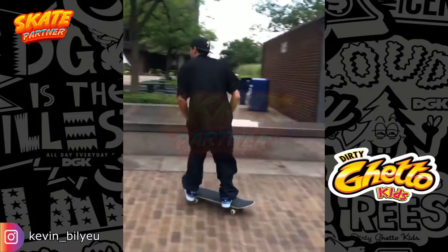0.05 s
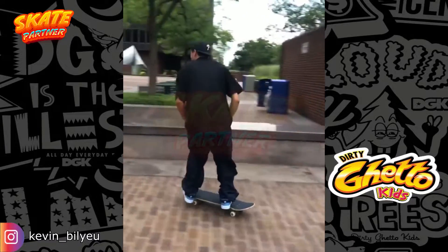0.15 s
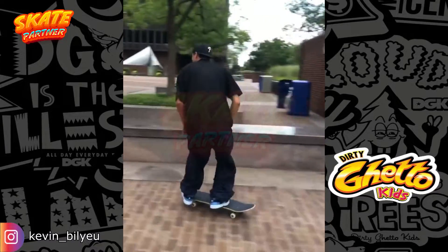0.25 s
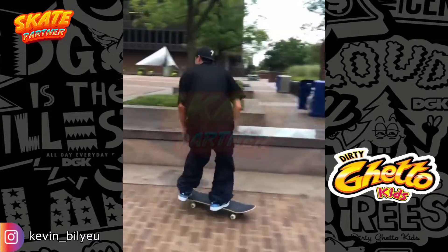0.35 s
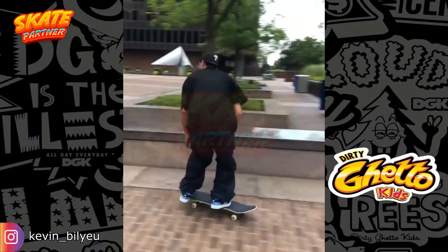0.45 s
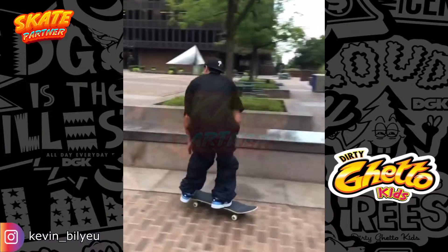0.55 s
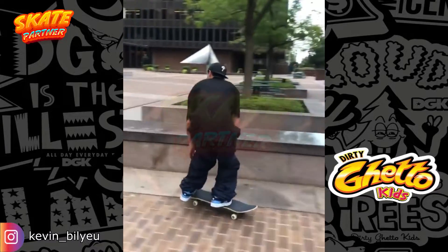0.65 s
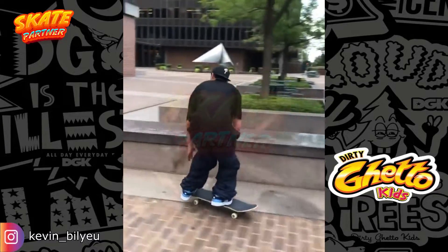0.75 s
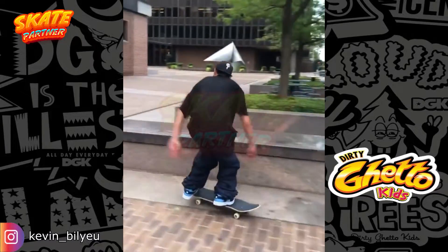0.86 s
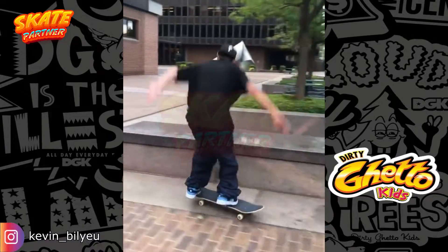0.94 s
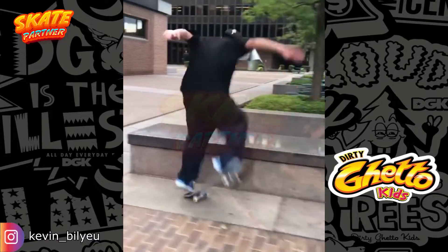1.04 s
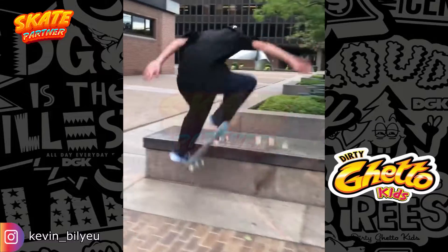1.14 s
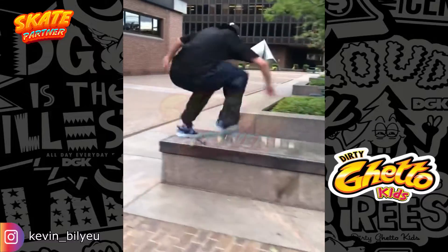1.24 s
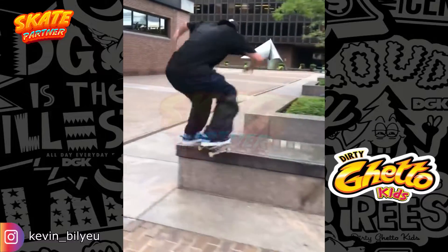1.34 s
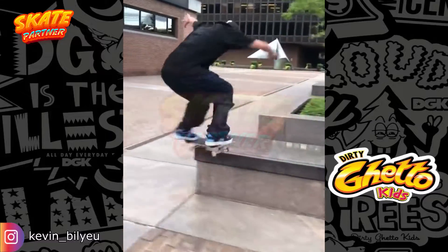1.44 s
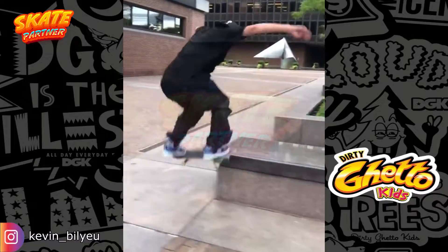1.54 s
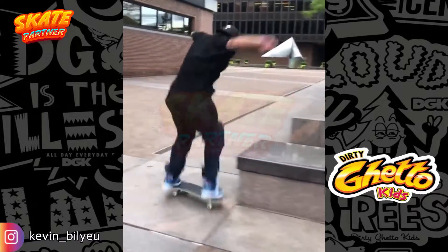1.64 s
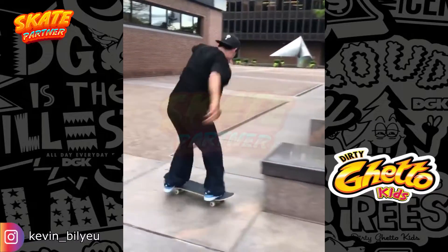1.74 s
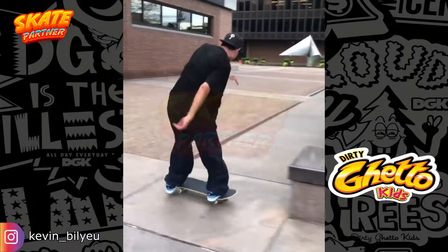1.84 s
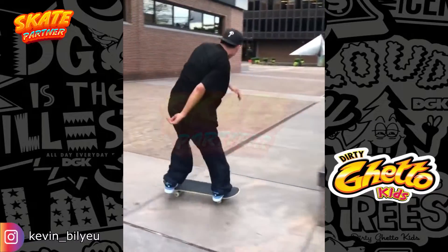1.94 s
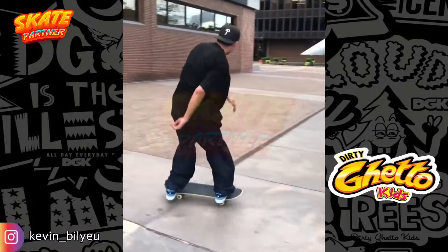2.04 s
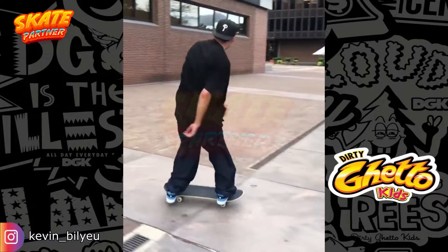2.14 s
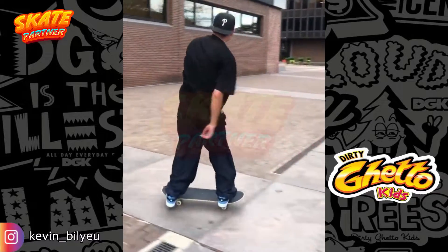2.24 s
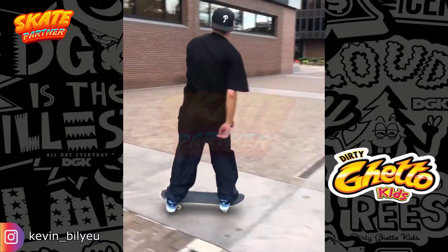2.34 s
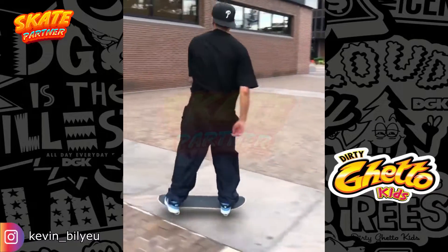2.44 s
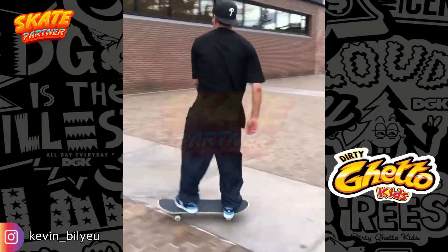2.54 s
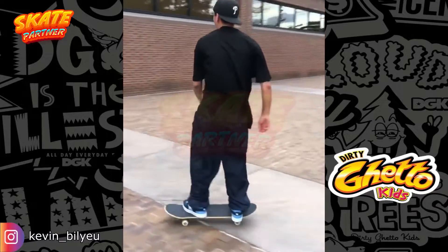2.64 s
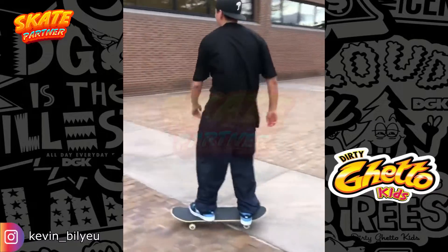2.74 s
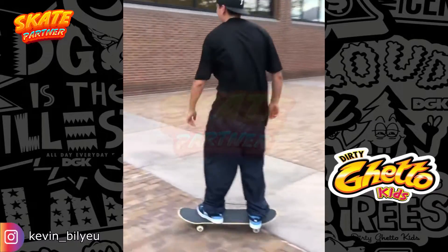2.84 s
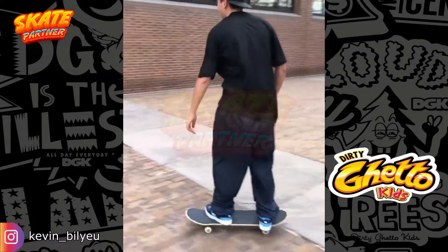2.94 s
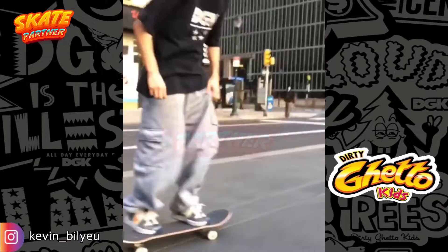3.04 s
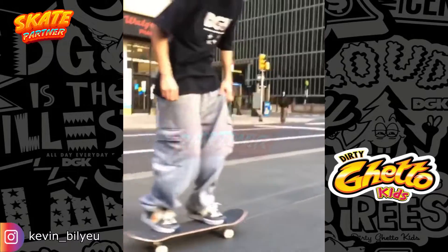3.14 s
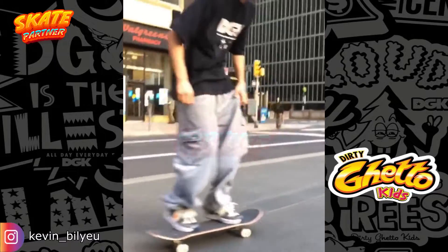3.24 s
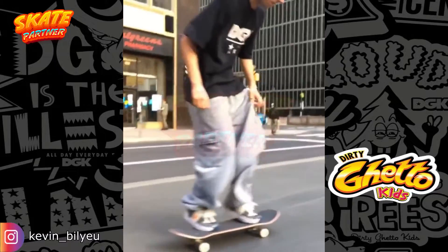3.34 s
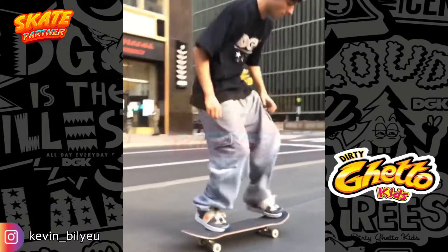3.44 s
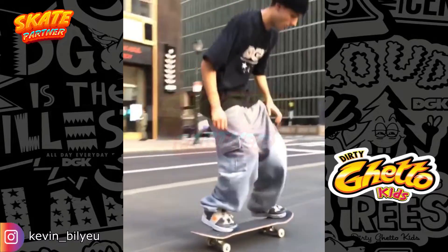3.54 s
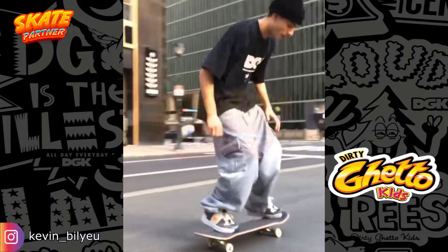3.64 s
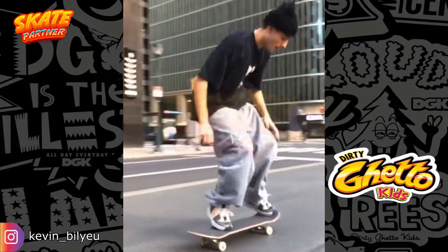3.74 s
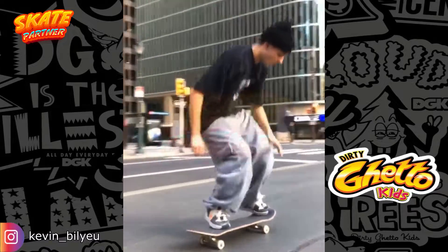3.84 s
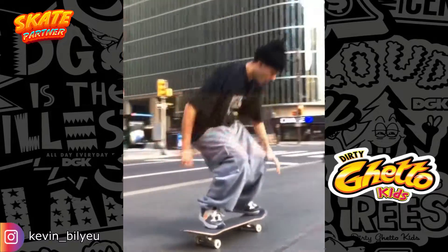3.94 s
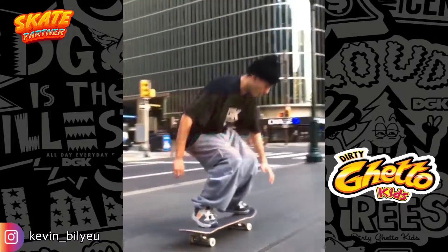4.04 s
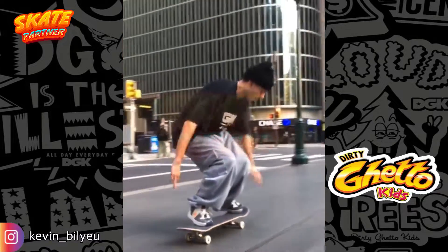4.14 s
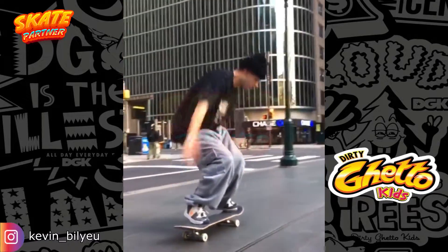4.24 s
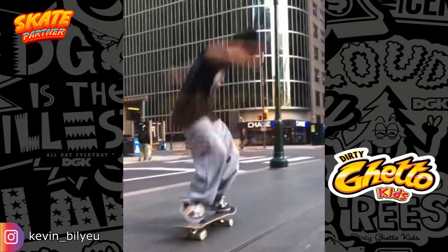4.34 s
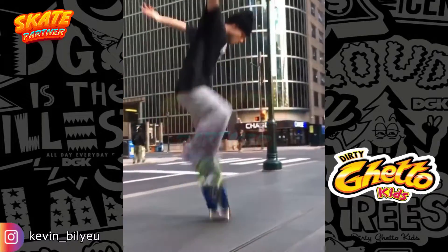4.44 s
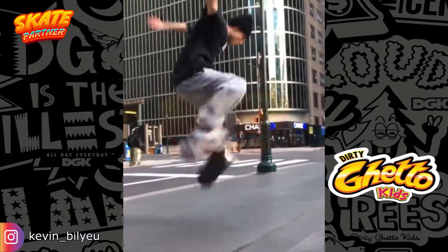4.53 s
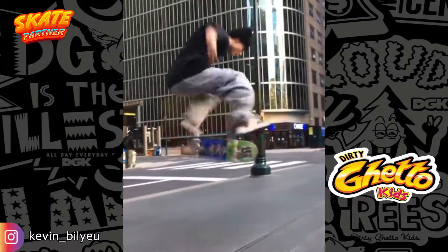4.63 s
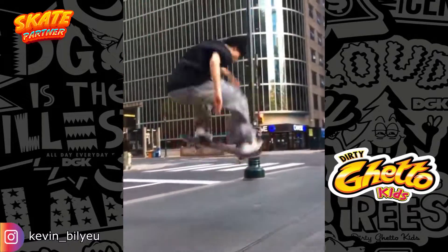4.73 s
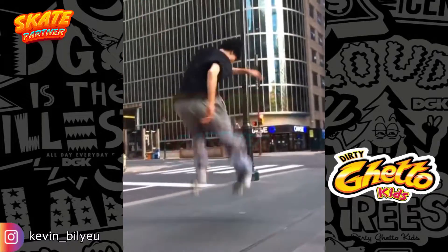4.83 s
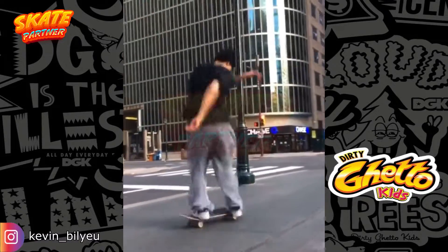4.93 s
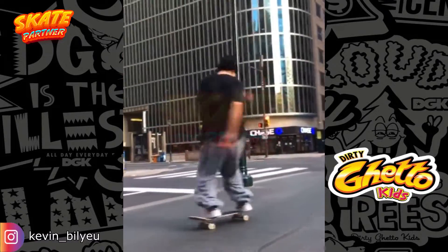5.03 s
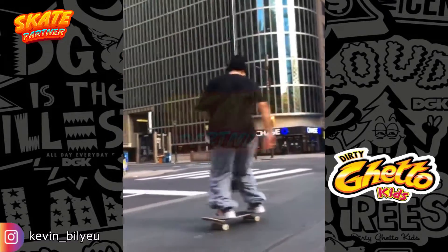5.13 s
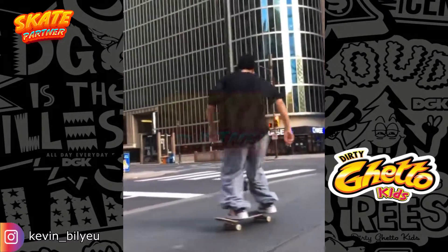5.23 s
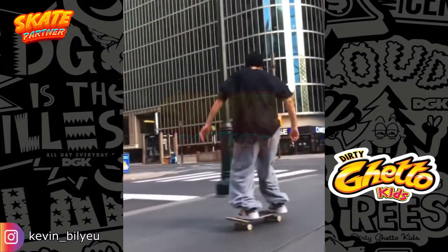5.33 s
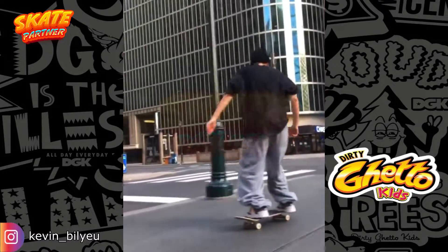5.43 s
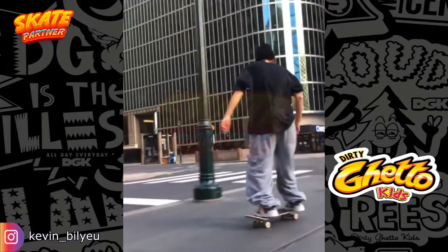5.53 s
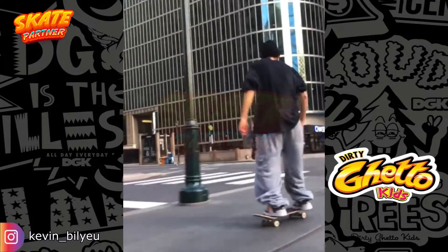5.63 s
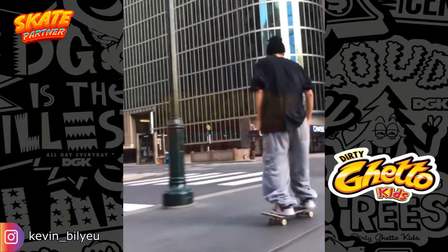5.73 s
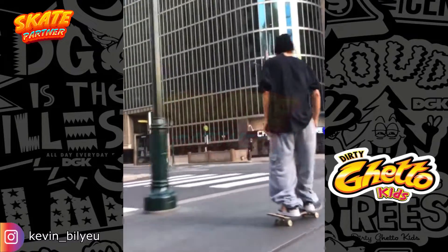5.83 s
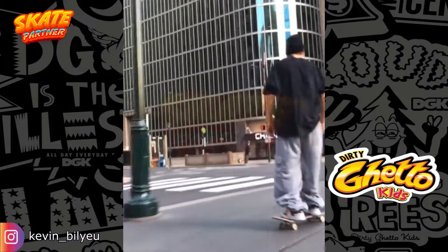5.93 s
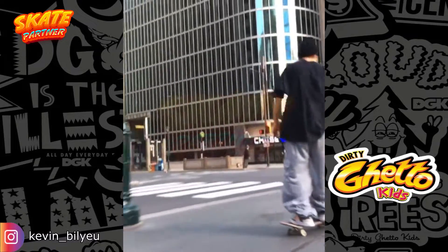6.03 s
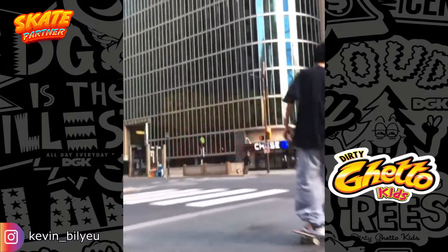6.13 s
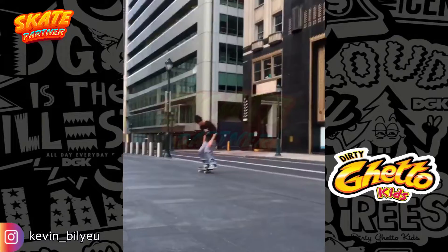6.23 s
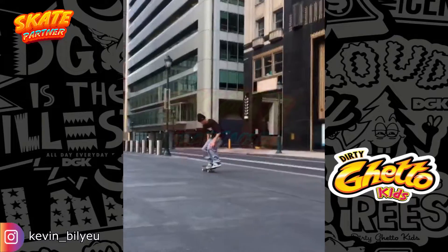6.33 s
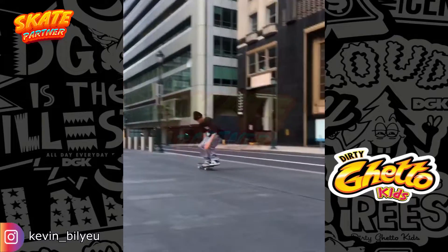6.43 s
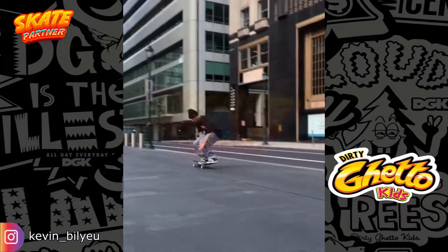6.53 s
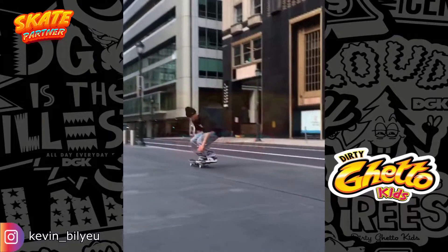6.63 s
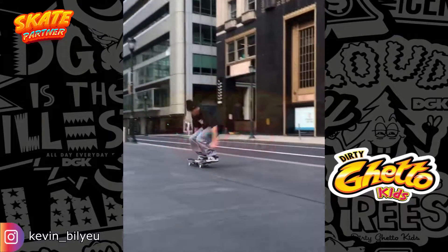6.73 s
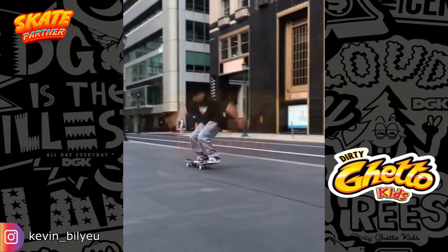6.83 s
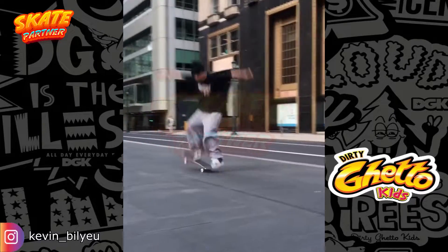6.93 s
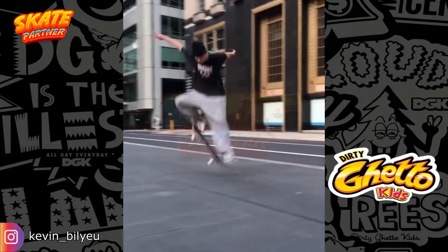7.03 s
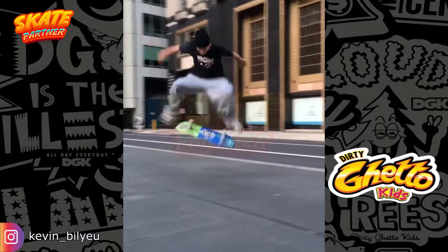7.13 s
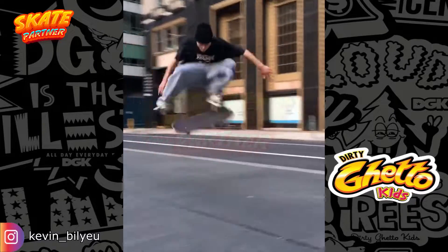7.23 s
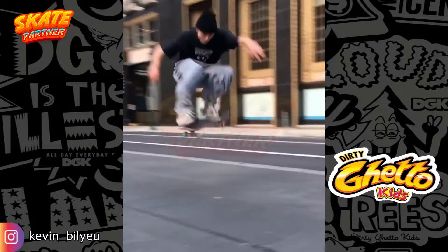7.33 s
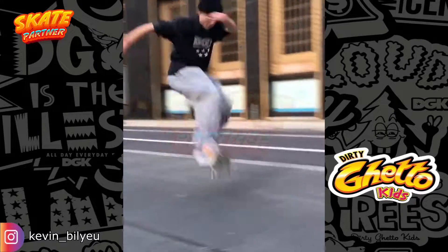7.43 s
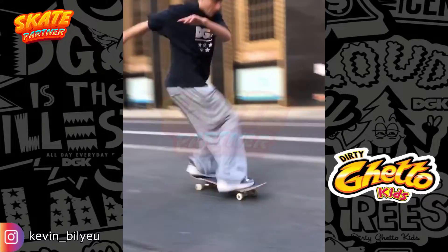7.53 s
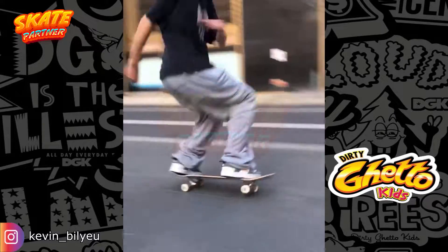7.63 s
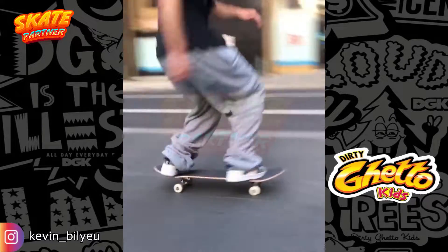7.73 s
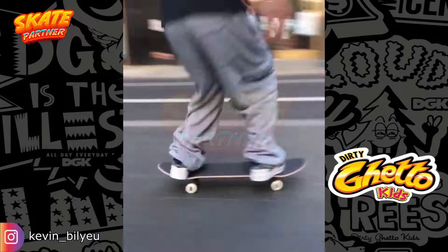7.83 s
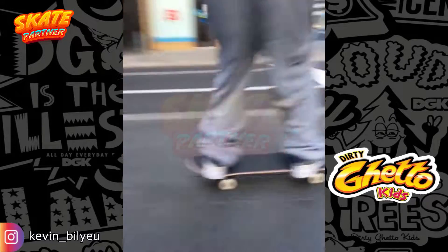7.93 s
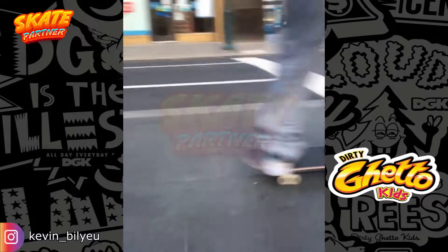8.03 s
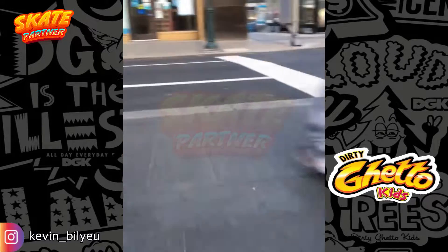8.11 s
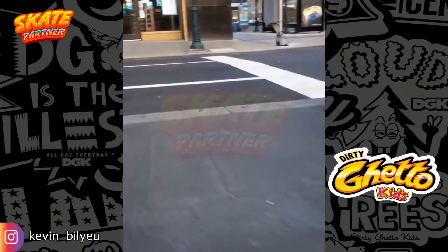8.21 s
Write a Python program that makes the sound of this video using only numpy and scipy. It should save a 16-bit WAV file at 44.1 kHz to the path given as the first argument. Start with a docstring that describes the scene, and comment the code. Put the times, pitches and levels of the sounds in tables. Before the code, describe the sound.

Three skateboard rides follow one another outdoors, heard from a moving microphone. First comes a warm, dull roll on brick with a tail pop, a short ledge grind and a heavy landing. Next the board coasts alongside on asphalt with gusts of wind, regular clacks and one sharp jump. Finally it approaches along a street, snaps up with a faint echo, lands hard and clatters close by.

```python
"""A moving microphone follows a skateboard through three spots; ground grain shakes deck and wheels, and the
bearings hiss. First a brick plaza, warm and dull: cracks knock, the tail pops, a truck grinds a ledge, the
board slams down. From 3 s it coasts alongside over an asphalt crossing, wind buffeting the microphone, with one
flip trick, while the camera's own board clacks in fours over seams. From 6.25 s, on an avenue, it pops far off,
lands nearer and rolls up close. House fronts answer the blows faintly throughout."""
import sys
import numpy as np
from scipy import signal
from scipy.fft import rfft, irfft, next_fast_len
from scipy.io import wavfile

SR = 44100
rng = np.random.default_rng(int(sys.argv[2]) if len(sys.argv) > 2 else 0)


def bounce(signal):
    """Save signal as a 16-bit WAV file at the path given by the first command-line argument."""
    frames = np.transpose(np.atleast_2d(signal))
    limited = np.clip(frames, -1, 1)
    pcm = np.round(limited * 32767).astype(np.int16)
    wavfile.write(sys.argv[1], SR, pcm)


N = 364694
TIME = np.arange(N) / SR
SIZE = next_fast_len(N + SR // 2, real=True)
FREQS = np.maximum(np.arange(SIZE // 2 + 1) * SR / SIZE, 1)
WHEELBASE_M, SEAM_GAP_M = .357, .521

# Time spent at each spot. Each row: start and end in seconds.
SPOTS = [(-.1, 2.986), (3.052, 6.25), (6.25, 8.4)]
PLAZA_SPAN, CROSSING_SPAN, AVENUE_SPAN = SPOTS


def from_db(db):
    """Decibels to gain."""
    return 10 ** (np.asarray(db) / 20)


def rms_one(x):
    """Scale to unit power."""
    return x / np.sqrt(np.mean(x ** 2) + 1e-20)


def drift(per_s):
    """A slow random wander of unit power."""
    knots = rng.standard_normal(int(N / SR * per_s) + 2)
    return rms_one(np.interp(TIME * per_s, np.arange(len(knots)), knots))


def in_time(rows):
    """One curve, sample by sample, for each column after the time."""
    s, *columns = np.transpose(rows)
    return [np.interp(TIME, s, column) for column in columns]


def slope(points):
    """Gain per frequency through (Hz, dB) points."""
    hz, db = np.transpose(points)
    return from_db(np.interp(np.log(FREQS), np.log(hz), db))


def humps(rings):
    """Gain per frequency of steep-sided resonances."""
    gains = [from_db(db) / (1 + (2 * (FREQS - hz) / width) ** 2) for hz, width, db in rings]
    return np.sqrt(sum(gain ** 2 for gain in gains))


def colour(x, gain):
    """Causal (minimum-phase) filter with the given gain."""
    cepstrum = irfft(np.log(gain + 1e-6), SIZE)
    cepstrum[1:SIZE // 2] *= 2
    cepstrum[SIZE // 2 + 1:] = 0
    return irfft(rfft(x, SIZE) * np.exp(rfft(cepstrum)), SIZE)[:N]


def add(track, s, sound):
    """Mix a sound in at s seconds."""
    start = int(s * SR)
    track[start:start + len(sound)] += sound[:N - start]


def during(span):
    """A gate with quick, soft edges."""
    inside_s = np.minimum(TIME - span[0], span[1] - TIME)
    return np.clip(inside_s / 0.0018 + .5, 0, 1) ** 2


def ground(stones_per_s, stones_db, contact_s):
    """Force under the wheels: fine texture plus a short crunch for every stone, of uneven size."""
    hits = rng.random(N) < stones_per_s / SR
    stones = hits * from_db(7.2 * np.minimum(rng.exponential(1, N), 3))
    crunch = signal.lfilter([1], [1, -np.exp(-2 / (contact_s * SR))], stones ** 2 + 1e-18)
    return rng.standard_normal(N) * np.sqrt(1 + from_db(2 * stones_db) * crunch / crunch.mean())


def rolling(rumble_db, roar_db, rings, stones_per_s, stones_db):
    """The ground's grain makes the deck rumble and the wheels roar."""
    # The deck's low resonances. Each row: centre and width in Hz, level in dB.
    deck_rings = [(169.8, 118, 1), (233.6, 90, -2.2)]
    rumble = colour(ground(stones_per_s, stones_db, contact_s=0.0021), humps(deck_rings))
    roar = colour(ground(stones_per_s, stones_db, contact_s=0.004), humps(rings))
    return from_db(rumble_db) * rms_one(rumble) + from_db(roar_db) * rms_one(roar)


def bearings(level_db, patches_db, spectrum, grit_db, sizzle):
    """Gritty hiss that swells on rough patches; sizzle dulls its top as level_db falls from its peak."""
    grit = ground(stones_per_s=480, stones_db=grit_db, contact_s=0.00034)
    hiss = rms_one(colour(grit, slope(spectrum)))
    top = irfft(rfft(hiss, SIZE) / (1 + (9900 / FREQS) ** 20), SIZE)[:N]   # above 9.9 kHz
    top_gain = from_db(sizzle * (level_db - level_db.max()))
    return from_db(level_db + 1.48 * patches_db) * (hiss - top + top * top_gain)


def wind(level_db, gust_db):
    """Low gusts buffet the moving microphone."""
    # Wind spectrum. Each row: frequency in Hz, level in dB.
    spectrum = [(15, -33), (28, -19), (42, -4), (60, -3), (90, -8), (130, -12.5), (300, -53.5), (1000, -78)]
    gusts = from_db(level_db + gust_db * drift(14))
    return gusts * rms_one(colour(rng.standard_normal(N), slope(spectrum)))


def plaza():
    """The board rolls over brick, ledge and slabs, with hardly any wind on the microphone."""
    # The ride. Each row: time in seconds, then rumble, roar and hiss in relative dB.
    levels = [(0.0, -34, -27, -53), (0.52, -27, -28, -54.5), (0.99, -32.5, -32.5, -56.5),
              (1.3, -35.5, -31, -55), (1.46, -35, -30, -53.5), (2.07, -32, -29, -53.5),
              (2.28, -31.5, -31.5, -59), (2.56, -36.5, -36.5, -57), (2.95, -37.5, -37.5, -59.5)]
    # Resonances on brick. Each row: centre and width in Hz, level in dB.
    rings = [(353, 130, 5.5), (440, 320, 2), (625, 300, 4.5), (820, 200, -1.5), (1150, 460, -5.5),
             (1543, 520, -7.5), (2070, 480, -20)]
    # Bearing hiss. Each row: frequency in Hz, level in dB.
    spectrum = [(1530, -22), (2600, 1.5), (2780, -12), (3220, 1), (6620, -11.5), (9310, -17.5),
                (10400, -24), (14700, -27)]
    rumble, roar, hiss = in_time(levels)
    patches_db = drift(60)
    out = rolling(rumble + 2, roar + 2 + patches_db, rings, stones_per_s=220, stones_db=0)
    out += bearings(hiss + 1.5, patches_db, spectrum, grit_db=-4.5, sizzle=.15)
    out += wind(-55.5, gust_db=1.5)
    return out * during(PLAZA_SPAN)


def drones():
    """Humming or scrubbing wheels, a truck on the ledge, bearings close by: each swells one resonance."""
    # Each row: middle and half length in seconds, centre and width in Hz, level in dB.
    rubs = [(0.252, 0.13, 237, 40, -27), (0.578, 0.049, 173.7, 25, -18), (1.36, .04, 7500, 4000, -57),
            (1.464, 0.057, 874, 160, -28), (6.615, 0.43, 328, 70.4, -28.5), (7.262, 0.03, 208, 45, -18.5),
            (7.803, 0.045, 195, 45.4, -26), (7.936, 0.087, 733, 110, -24.5), (7.982, 0.28, 8800, 900, -46),
            (8.151, 0.074, 98, 35, -20.5)]
    out = np.zeros(N)
    for s, half_s, hz, width, db in rubs:
        swell = from_db(db) * np.exp(-((TIME - s) / half_s) ** 4)
        out += swell * rms_one(colour(rng.standard_normal(N), humps([(hz, width, 0)])))
    return out


def blow(levels_db, contact_s, chatter, snap=0):
    """A short rough contact rings the board; one level for each register (thud, knock, bite, crack)."""
    # Modes from deck flex up to trucks. Each row: frequency in Hz, level in dB, t60 in seconds.
    modes = [(173, -4.5, 0.048), (208, -10.5, 0.052), (290, -0.5, 0.018), (476, 1.5, 0.025),
             (640, 4.5, 0.028), (823, 0.5, 0.026), (1145, 4, 0.019), (1350, -1, 0.024), (1554, -1, 0.011),
             (2007, 4, 0.0095), (2290, 0, 0.022), (2430, 0, 0.0022), (3290, -1, 0.008), (3855, 5, 0.0097),
             (4350, 0.5, 0.015), (5350, 8, 0.0017), (7300, 9.5, 0.0016), (9300, 10, 0.0024),
             (11350, 3, 0.0063), (12600, 9, 0.0032)]
    # The borders between the four registers, in Hz.
    edges_hz = [400, 1700, 3500]
    t = np.arange(SR // 6) / SR
    press = t / contact_s * np.exp(-t / contact_s)
    rattle = chatter * np.exp(-t / 0.0082)   # loose trucks
    force = (press + rattle) * rng.standard_normal(len(t))
    force[int(contact_s * SR)] += snap   # bare wood or metal meets the ground in one hard spike
    registers = np.zeros((len(levels_db), len(t)))
    for hz, db, t60 in modes:
        loaded_hz = hz * (1 + 0.03 * rng.standard_normal())   # the feet load the deck anew each time
        ringing = from_db(db - 60 * t / t60) * np.sin(2 * np.pi * loaded_hz * t)
        registers[np.searchsorted(edges_hz, hz)] += rng.choice([-1, 1]) * ringing
    out = 0
    for ringing, db, low_hz in zip(registers, levels_db, [120] + edges_hz):
        sound = signal.fftconvolve(force, ringing)[:len(t)]
        low_cut = signal.butter(2, 0.99 * low_hz, "high", fs=SR, output="sos")
        out += from_db(db) * rms_one(signal.sosfilt(low_cut, sound))
    return out * np.sqrt(.012 / t[-1])   # levels hold as if the energy fell within 12 ms


def cracks(thud_db, knock_db, bite_db, crack_db):
    """A soft wheel crosses a single crack with a dull clack."""
    # Each row: start in seconds, body and treble in relative dB.
    hits = [(0.682, -12, -38), (1.542, -10.5, -43), (1.922, -15, -37), (2.21, -7, -36), (2.311, -14, -53),
            (2.429, -13, -47), (2.489, -7, -31), (2.841, -25, -46), (6.482, -9.5, -29), (6.713, -12.5, -30),
            (7.774, -18.5, -25), (7.883, -15.5, -19.5), (7.985, -9.5, -17), (8.097, -8, -15)]
    out = np.zeros(N)
    for s, body, treble in hits:
        levels = [body + thud_db, body + knock_db, treble + bite_db, treble + crack_db]
        add(out, s, blow(levels, contact_s=0.0016, chatter=0.08))
    return out


def street_scatter(blows, tail_db, t60):
    """Ground and house fronts scatter the blows: in each octave, noise carries their dying energy."""
    # The street's ring varies over time and is strongest around the distant pop at 7 s.
    # Each row: time in seconds, send in dB.
    send_db = [(0, 4), (6.2, -3), (6.3, -28), (7.1, 14), (7.5, -3), (8.3, 5)]
    sent = blows * from_db(in_time(send_db)[0])
    decay = from_db(-120 / (t60 * SR))
    out = 0
    for low_hz in 110 * 2. ** np.arange(7):
        band = signal.butter(2, [low_hz, 2 * low_hz], "band", fs=SR, output="sos")
        power = signal.sosfilt(band, sent + 1e-12) ** 2 + 1e-18
        lingering = signal.lfilter([1 - decay], [1, -decay], power)
        out += np.sqrt(lingering) * rms_one(signal.sosfilt(band, rng.standard_normal(N)))
    tone = slope([(150, 3.0), (800, -2.5), (2800, -1), (6000, -6.0), (14000, -12)])
    return from_db(tail_db) * colour(out, tone)


def ticks(body_db, bite_db, crack_db, grit_per_s):
    """Shoes, trucks and stones touch the board lightly; on the avenue stray grit clicks too."""
    # Each row: start in seconds, relative level in dB.
    touches = [(0.822, -35.5), (1.4988, -27.5), (1.5184, -31), (1.5652, -22.5), (6.6345, -28), (6.798, -24),
               (6.8675, -24.5), (7.0249, -24), (7.3382, -22)]
    start, end = AVENUE_SPAN[0], N / SR
    count = int(grit_per_s * (end - start))
    grit = [(rng.uniform(start, end), rng.normal(-33.5, 1.5)) for _ in range(count)]
    out = np.zeros(N)
    for s, db in touches + grit:
        tick = blow([body_db, body_db, bite_db, crack_db], contact_s=0.0016, chatter=0.087)
        add(out, s, from_db(db) * tick)
    return out


def pops(thud_db):
    """The bare wooden tail snaps against the ground: bright, with little thud."""
    # Each row: start in seconds, knock, bite and crack in dB, contact time in seconds.
    snaps = [(1.084, -13.5, -20, -25, 0.00129), (4.326, -12.5, -13, -28, 0.00054),
             (7.039, -15, -21, -20.5, .0016)]
    out = np.zeros(N)
    for s, knock, bite, crack, contact_s in snaps:
        add(out, s, blow([knock + thud_db, knock, bite, crack], contact_s, chatter=0.26, snap=4.1))
    return out


def harder(levels_db, hardness_db):
    """A harder contact lifts the bite and crack registers."""
    return np.array(levels_db) + hardness_db * np.array([0, 0, 1, 1])


def landings(thud_db, knock_db, bite_db, crack_db):
    """The loaded board slams down one truck after the other, and the first truck rebounds twice."""
    # Each row: start and second truck's lag in seconds, then first truck, second truck,
    # bite, crack and rebound in relative dB.
    slams = [(1.31, .013, -14, -4, -2, -2, -20), (1.675, 0.018, -3, -5, -4, -8.5, -8),
             (4.801, .014, -6, -12, 8, 2.5, -8), (7.525, 0.043, -6.5, -7.5, 4, 4, -0.5)]
    hop_s, hop_loss_db = .009, 7.5
    out = np.zeros(N)
    for s, lag, first, second, bite, crack, rebound in slams:
        levels = [thud_db, knock_db, bite_db + bite, crack_db + crack]
        hops = [((k + 1) * hop_s, first + rebound - k * hop_loss_db) for k in range(2)]
        for delay, db in [(0, first), (lag, second)] + hops:
            hardness = .5 * (db - max(first, second))   # lighter strikes are duller
            strike = blow(db + harder(levels, hardness), contact_s=.0017, chatter=0.36, snap=4.6)
            add(out, s + delay, strike)
    return out


def crossing(coast_start_s):
    """The board coasts on asphalt beside the microphone, getting quieter as it loses speed."""
    # Resonances on the crossing. Each row: centre and width in Hz, level in dB.
    rings = [(346, 180, -0.5), (497, 187, 6), (675, 160, 4.5), (825, 254, -0.5), (1206, 340, 2),
             (1410, 228, -2.5), (2290, 280, -18)]
    # Bearing hiss. Each row: frequency in Hz, level in dB.
    spectrum = [(1470, -30), (2500, 3), (2910, -2), (4260, 0), (4850, -3.5), (5940, -5.5), (10300, -2.5),
                (11200, 5), (12000, 1.5), (14000, 1.5)]
    # Wind on the microphone. Each row: time in seconds, level in dB.
    wind_db = [(3.08, -26.5), (4.35, -25), (4.37, -18.5), (5.22, -23.5), (5.4, -13), (5.47, -22),
               (5.68, -15), (6.12, -23), (6.23, -15.5)]
    # A stretch of coarse paving: middle and half length in seconds, lift in dB.
    coarse_paving = (3.42, 0.23, 2.6)
    s, half_s, lift_db = coarse_paving
    swell_db = lift_db * np.exp(-((TIME - s) / half_s) ** 2)
    rumble, roar, hiss = [swell_db - db_per_s * (TIME - coast_start_s) for db_per_s in (.2, .78, .8)]
    patches_db = 1.5 * drift(60)
    out = rolling(rumble - 26.5, roar - 18.5 + patches_db, rings, stones_per_s=400, stones_db=-5)
    out += bearings(hiss - 34, patches_db, spectrum, grit_db=-10, sizzle=0)
    out += wind(in_time(wind_db)[0], gust_db=1)
    return out * during(CROSSING_SPAN)


def seams(coast_start_s, thud_db, knock_db, bite_db, crack_db):
    """Both axles of the camera's own board cross each pair of seams: four clacks that spread out as it slows."""
    # Each row: start in seconds, strength and hardness in relative dB.
    pairs = [(3.212, 1.5, -1.5), (3.639, 0, -2), (4.071, 0, 0.5), (4.513, 0, -0.5), (4.962, -1, 0),
             (5.421, -0.5, 2), (5.893, 0, -3)]
    # The four clacks. Each row: distance rolled in metres, accent and hardness in dB.
    clacks = [(0, 0, -2), (WHEELBASE_M, -0.36, 3.7), (SEAM_GAP_M, 0, 1.3),
              (SEAM_GAP_M + WHEELBASE_M, 0.36, -1.1)]
    start_m_per_s, slowing_m_per_s2 = 4.34, .228
    out = np.zeros(N)
    for s, db, hardness in pairs:
        speed = start_m_per_s - slowing_m_per_s2 * (s - coast_start_s)
        for metres, accent, edge in clacks:
            levels = db + accent + harder([thud_db, knock_db, bite_db, crack_db], hardness + edge)
            add(out, s + metres / speed, blow(levels, contact_s=0.0017, chatter=0.1))
    return out


def avenue():
    """The board rolls up to the microphone on asphalt, its hiss brightening as it nears."""
    # The approach. Each row: time in seconds, then rumble, roar and hiss in relative dB.
    levels = [(6.3, -32.5, -29, -45.5), (7.02, -29, -28, -42), (7.15, -27.5, -26.5, -45.5),
              (7.364, -34.5, -26.5, -43), (7.768, -28.5, -28, -38.5), (8.024, -31, -26.5, -35.5),
              (8.26, -22.5, -22.5, -38.5)]
    # Resonances on the avenue. Each row: centre and width in Hz, level in dB.
    rings = [(341, 297, 7), (470, 98, -6), (620, 180, 3), (780, 380, -2), (1180, 690, -6),
             (1640, 1100, -15), (2080, 1430, -17.5)]
    # Bearing hiss. Each row: frequency in Hz, level in dB.
    spectrum = [(1470, -27), (2500, 0.5), (3580, 1), (4260, -1), (4920, -5.5), (6810, -2), (8090, -5),
                (8830, 0.5), (10300, -3), (13300, 0.5), (14000, -1)]
    # Wind on the microphone. Each row: time in seconds, relative level in dB.
    wind_db = [(6.32, -42.5), (7.222, -37), (7.994, -37), (8.26, -28)]
    rumble, roar, hiss = in_time(levels)
    patches_db = 1.5 * drift(60)
    out = rolling(rumble + 1, roar + 2 + patches_db, rings, stones_per_s=610, stones_db=-9.5)
    out += bearings(hiss + 4, patches_db, spectrum, grit_db=-7.5, sizzle=.4)
    out += wind(in_time(wind_db)[0] + .5, gust_db=1.5)
    return out * during(AVENUE_SPAN)


def far_off(blows, echo_s, echo_db, wall_cut_hz):
    """Distant blows lose their very top, and a house front returns one dull echo."""
    # Tone over that distance. Each row: frequency in Hz, gain in dB.
    air = [(2000, -1), (4200, 2), (8000, 2), (12500, -7)]
    echo = np.interp(TIME - echo_s, TIME, blows, left=0)
    wall = signal.butter(2, wall_cut_hz, fs=SR, output="sos")
    return colour(blows, slope(air)) + from_db(echo_db) * signal.sosfilt(wall, echo + 1e-18)


def scene():
    """Three rides in turn, their blows coloured by place and distance."""
    # The plaza's warmer, duller microphone. Each row: frequency in Hz, gain in dB.
    plaza_tone = [(110, -3), (200, 3), (330, -1.5), (520, -6.5), (720, 1), (1200, -6), (2000, -1),
                  (4300, -4.5), (5500, 2.5), (9400, -14), (10600, -18), (14000, -27)]
    # While the board is far down the avenue: start and end in seconds.
    far_span = (6.25, 7.3)
    coast_start_s = 3.212
    rides = plaza() + crossing(coast_start_s) + avenue()
    blows = pops(thud_db=-18)
    blows += landings(thud_db=-7.5, knock_db=-4, bite_db=-14.5, crack_db=-16)
    blows += seams(coast_start_s, thud_db=-18, knock_db=-10.5, bite_db=-34.5, crack_db=-33.5)
    blows += cracks(thud_db=-13.5, knock_db=-6.5, bite_db=-15, crack_db=-9.6)
    blows += ticks(body_db=-5.5, bite_db=-11, crack_db=-12.5, grit_per_s=3)
    in_plaza = TIME < PLAZA_SPAN[1]
    far = (TIME > far_span[0]) & (TIME < far_span[1])
    heard = colour(blows * in_plaza, slope(plaza_tone))
    heard += far_off(blows * far, echo_s=.063, echo_db=-8.5, wall_cut_hz=4200)
    heard += blows * ~(in_plaza | far)
    return (rides + drones() + heard + street_scatter(heard, tail_db=-15.5, t60=0.4))[None]


def record(dry):
    """Peaks are squashed; the treble drops steeply above 16 kHz, and from 3 s on above 14 kHz."""
    squashed = dry[0] / (1 + dry[0] ** 4) ** (1 / 4)
    in_street = TIME > PLAZA_SPAN[1]
    street = colour(squashed * in_street, slope([(13800, 0), (14200, -18)]))
    low_pass = slope([(15800, 0), (16300, -70)])
    return colour(squashed * ~in_street + street, low_pass)[None]


dry = scene()
out = record(dry)
bounce(out)
```